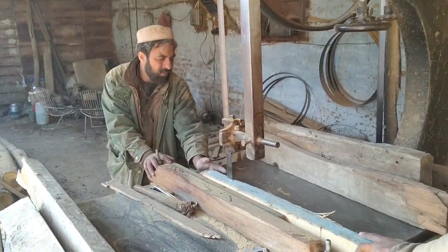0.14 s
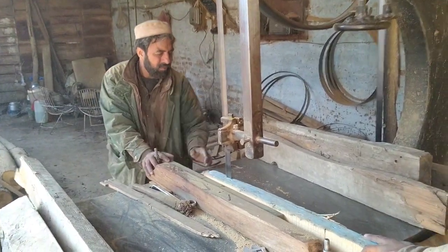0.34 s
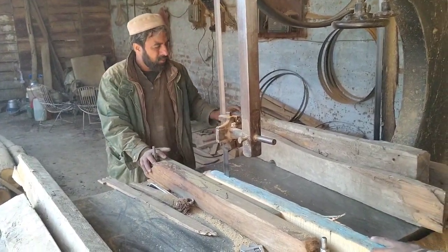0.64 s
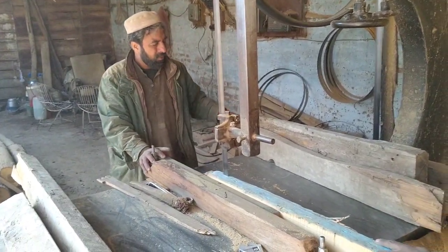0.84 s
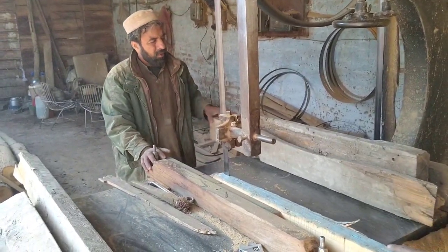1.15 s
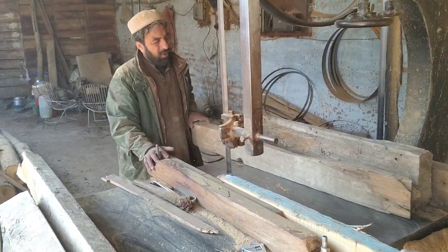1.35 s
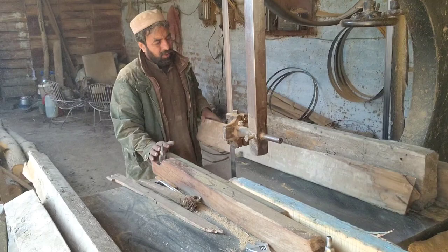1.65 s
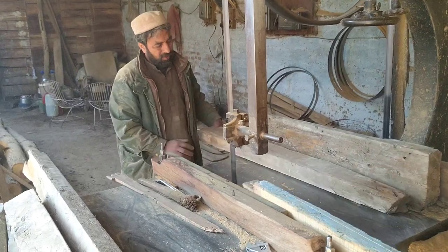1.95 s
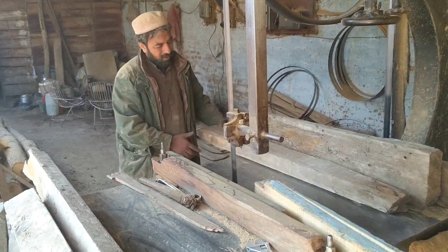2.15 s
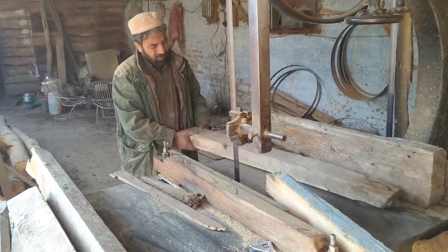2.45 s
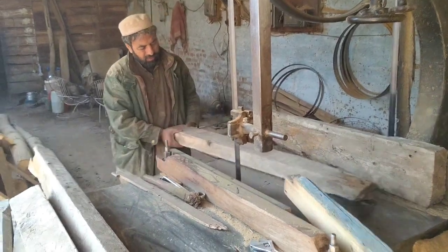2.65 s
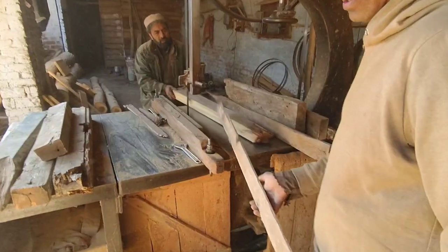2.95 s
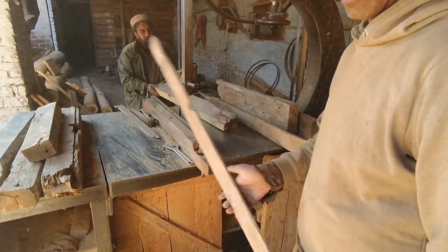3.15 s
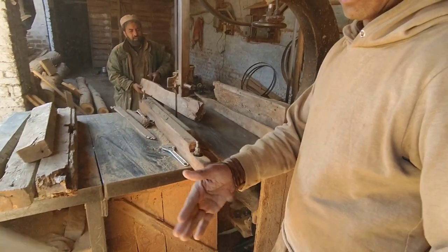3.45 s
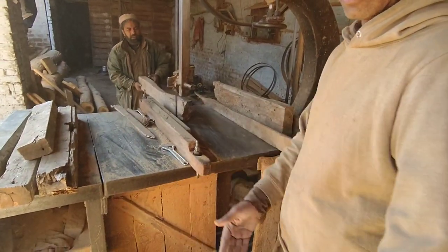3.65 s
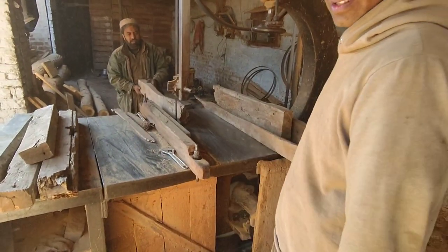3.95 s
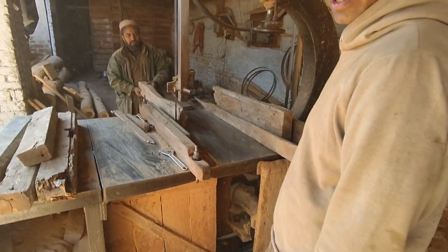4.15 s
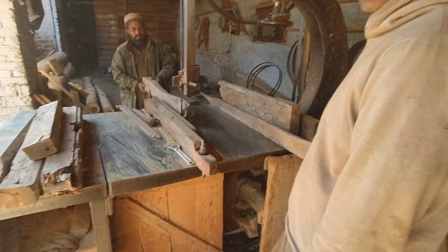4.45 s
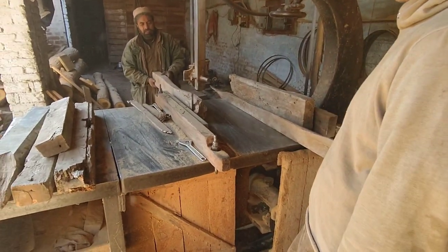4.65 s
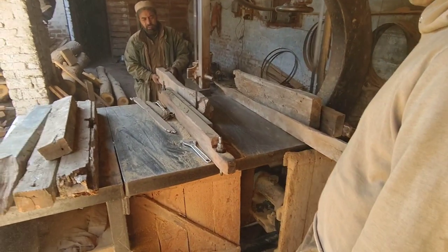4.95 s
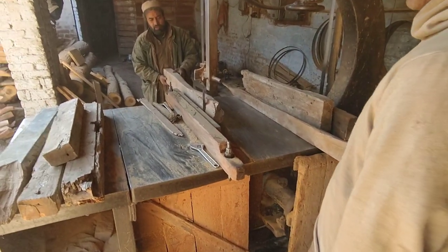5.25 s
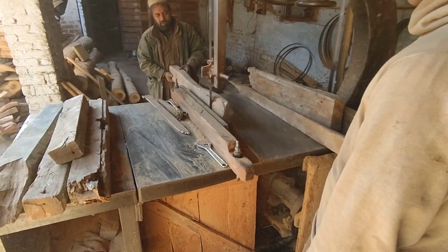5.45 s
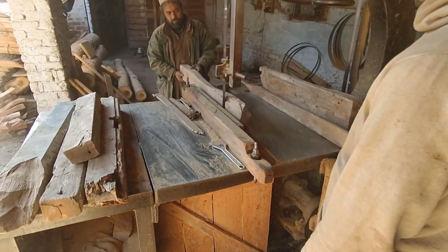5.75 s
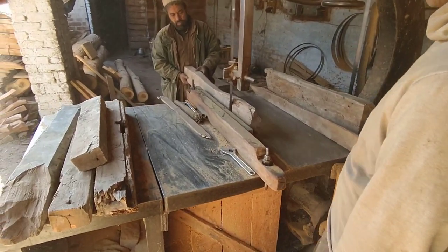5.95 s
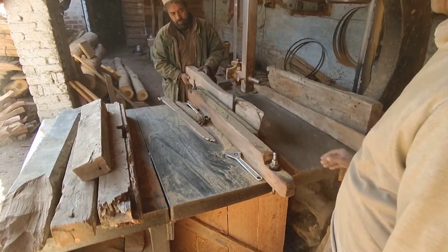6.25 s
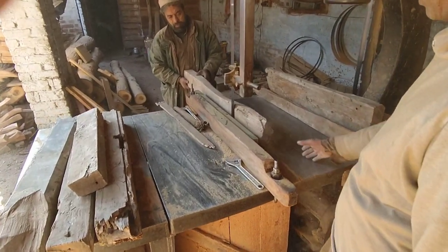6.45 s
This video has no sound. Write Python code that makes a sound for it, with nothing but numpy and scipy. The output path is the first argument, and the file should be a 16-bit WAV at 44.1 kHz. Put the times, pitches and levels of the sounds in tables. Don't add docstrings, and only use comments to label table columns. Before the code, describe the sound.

Handheld phone close to a running band saw in an open shed with a short echo. Steady tearing hiss wavers as wood is pushed into the blade, with ringing frame tones and a thin bearing squeal. A few wooden clacks come first, then an abrupt tiny silence and a changed, whinier saw tone. Sharp plank knocks follow, then a loud close clattering tumble that makes the saw dip before it recovers and continues.

```python
import sys
import numpy as np
from scipy import signal
from scipy.fft import rfft, irfft
from scipy.io import wavfile
from scipy.ndimage import uniform_filter1d

SR = 44100
rng = np.random.default_rng(int(sys.argv[2]) if len(sys.argv) > 2 else 0)


def log_audio(samples):
    frames = np.atleast_2d(samples).T
    limited = np.clip(frames, -1, 1)
    pcm = np.round(limited * 32767).astype(np.int16)
    wavfile.write(sys.argv[1], SR, pcm)


def voltage_ratio(level):
    return 10 ** (np.asarray(level, float) / 20)


N = 291060
T = np.arange(N) / SR

# pitch_hz, level_db (per Hz)
BODY_RIGHT = [(20, -8), (90, -9), (150, -2.5), (230, 1), (400, -3), (1100, 4), (1900, -1.5), (2300, -11.5)]
RASP = [
    [(1500, -19.5), (1900, -7.5), (2200, -2.5), (2750, 1.5), (3300, -1.5), (3700, -4), (4200, -29)],
    [(1500, -30.5), (1900, -4.5), (2300, -2.5), (2800, -2), (3300, -2.5), (3700, 1.5), (4200, -38)],
]
WHINE = [
    [(3650, -41), (3760, -7), (3900, -3.5), (4100, -4), (4500, -11.5), (5000, -12), (6200, -30.5),
     (6900, -37.5)],
    [(3650, -25), (3760, -8.5), (3900, -3.5), (4300, -2.5), (5000, -4.5), (5600, -8.5), (6200, -20),
     (7300, -24.5)],
]
FIZZ_RIGHT = [(5800, -18.5), (6500, -19), (7200, -10), (8200, -7.5), (10200, -5.5), (10600, 1), (12000, -5),
              (14300, -6)]
# pitch_hz, level_db (per Hz)
BODY_LEFT = [(20, -7.5), (80, -14), (140, -0.5), (230, 1.5), (400, -5), (1100, -3.5), (1500, -21),
             (2200, -35)]
BLADE_LEFT = [(1300, 12), (2200, 13.5), (3300, 6.5), (3750, 10), (4000, 15), (4600, 8.5), (5200, 2),
              (5650, -6.5)]
FIZZ_LEFT = [(5700, -20), (6250, -19), (6800, -9), (7600, -3), (9700, -2.5), (10650, 7), (12000, 4.5),
             (14300, 7)]
# pitch_hz, width_hz, first_scene_db,
# second_scene_db
METAL_RINGS = [(156, 30, 4, 5), (232, 22, 5, 6), (300, 30, 3, 3), (576, 30, 3, 5), (767, 22, 6, 4),
               (933, 26, 3, 4), (1100, 60, 4, 4), (1356, 16, 5, 6), (1750, 30, 1, 1.5),
               (2181, 24, 6, 3), (2719, 40, 4, 2), (3040, 40, 3, 1), (3266, 50, 3, 1), (4350, 36, 2, 3),
               (3900, 36, 2, 5), (3965, 28, 2, 5), (4030, 28, 2, 4), (4220, 40, 2, 2), (4500, 40, 1, 2),
               (4750, 50, 2, 3), (4890, 28, 1, 4)]
RINGS = METAL_RINGS
# pitch_hz, likeness (0 to 1)
LIKENESS = [(100, 1), (200, 0.95), (800, 0.99), (1300, 0.077), (2200, 0.082), (4000, 0.14), (6000, 0.21),
            (14000, 0.2)]
# start_s, end_s, pitch_hz, width_hz, rise_db
SPELLS = [(0, 1.76, 4362, 36, 7), (1.8, 2.15, 1356, 18, 4), (3.28, 3.55, 1356, 18, 4),
          (3.3, 3.5, 1110, 50, 5), (4.25, 4.7, 1356, 18, 3), (4.75, 5.12, 1750, 30, 4),
          (5.5, 5.92, 1750, 30, 4), (5.9, 6.6, 510, 50, 5), (2.42, 2.66, 400, 30, 7),
          (1.46, 1.82, 1000, 500, 3), (1.87, 2.66, 3980, 160, 4), (.62, .95, 12000, 5000, 2),
          (4.05, 4.4, 12000, 5000, -2), (2.42, 2.66, 2900, 1200, -2), (1.3, 1.745, 2900, 1000, 2),
          (1.76, 1.87, 3000, 600, 3), (.2, .66, 2800, 900, -2), (1.75, 1.97, 2200, 800, -4),
          (5.7, 6.6, 7400, 2400, -5), (2.8, 6.6, 890, 200, -3.5), (0, .8, 170, 200, -4),
          (6, 6.6, 150, 120, -4), (2.9, 4, 250, 300, 2.5), (.8, 1.46, 1300, 700, 2),
          (5.215, 5.26, 4800, 2000, -3.5), (5.08, 5.45, 11000, 6000, 2.5), (4.09, 4.135, 3100, 1000, 4),
          (5.26, 5.4, 600, 1200, -4), (5.12, 5.36, 6200, 1500, -3), (1.9, 2.66, 5000, 900, 1.5),
          (2.85, 3.7, 1105, 50, 3), (4.095, 4.13, 2500, 700, 4), (5.45, 6.0, 1790, 60, 4)]
# start_db, drift_db_per_s, jump_db
FIRST_LEVELS = [
    (-28, -3, 5),
    (-21.5, 1.22, -2),
    (-26.5, 0.43, 6),
    (-27, -1.18, 2),
    (-32.5, -2.5, 2),
    (-26.5, -3, -3),
]
# level_db, then shares (ratio) of surge, turning, nearness, duck
SECOND_LEVELS = [
    (-29, 0.86, -0.13, 0.88, 0.33),
    (-28, 1.02, -0.0056, 0.87, 0.25),
    (-17.5, 1.02, 0.052, 0.13, 0.49),
    (-24, 1.33, 0.054, 0.42, 0.31),
    (-32, 0.1, 0.23, 0.72, 1.05),
    (-29.5, 0.24, 0.67, .1, 0.91),
]
# time_s, left_turned_db, near_frame_db
HOLD = [
    (3.0, -12.5, -6),
    (3.35, -15, -3),
    (3.8, -14, 0),
    (4.2, -8, 0.5),
    (4.7, -7.5, 1.5),
    (4.95, 1, -1),
    (5.5, -5.5, -0.5),
    (5.9, -4, -1.5),
    (6.15, 3, -3),
    (6.6, 0.5, 0.5),
]
# time_s, surge_db, half_length_s
SURGES = [(0.0, -2.3, 0.029), (0.06, 3.5, 0.011), (0.167, -2, 0.062), (0.364, 2.5, 0.099),
          (0.52, -1, 0.053), (0.65, -3, 0.028), (0.718, 2.5, 0.027), (0.847, 1, 0.05), (1.116, -0.9, 0.056),
          (1.266, 0, .05), (1.527, 1, 0.074), (1.421, -4.5, 0.013), (1.667, 2, 0.033), (1.992, -2, 0.029),
          (2.163, 2, 0.022), (2.289, -4, 0.035), (2.39, 2, 0.032), (2.486, -2.4, 0.04), (2.998, 4, 0.1),
          (3.13, -3, 0.019), (2.22, 0.5, .04), (3.246, 1, 0.052), (3.33, -1.5, 0.051), (3.44, 2, 0.043),
          (3.577, -0.9, 0.054), (3.786, -1, .04), (4.303, 2, 0.054), (3.664, 2, 0.027), (3.883, 2.1, 0.09),
          (4.07, 1, 0.042), (4.183, -3.5, 0.047), (4.428, -2, 0.076), (4.6, -0.5, 0.035),
          (4.74, 0.5, 0.079), (4.873, -1, .05), (5.063, -1.5, 0.069), (5.157, -2, 0.035), (5.557, 0, .04),
          (5.76, 1, .04), (6.07, 1, 0.11), (6.508, 3, 0.026), (5.375, -3.5, 0.046), (5.674, 1.0, 0.15),
          (5.946, 3, 0.02), (6.24, -2, 0.048), (6.35, -1, 0.03), (6.543, -1.5, 0.051)]
# start_s, port (0 left, 1 right), depth_db, hold_s, recovery_s
DUCKS = [
    (1.742, 1, 7, 0.031, 0.037),
    (1.745, 0, -0.5, .14, .05),
    (2.726, 1, 21, 0.11, 0.08),
    (2.73, 0, 11.5, 0.099, 0.081),
    (4.132, 0, 1, 0.14, 0.045),
    (4.2, 1, 0.5, 0.25, 0.014),
    (5.16, 0, 6, 0.016, .02),
    (5.178, 0, 18, 0.064, 0.14),
]
# start_s, left_peak_db, low_mode_hz, high_mode_hz, decay_60db_s
KNOCKS = [(1.3366, -14, 270, 775, 0.091), (1.3394, -14.5, 768, 518, .09), (1.349, -12, 288, 760, .06),
          (1.358, -14.5, 350, 714, 0.05), (1.364, -20, 340, 250, 0.039), (1.376, -16.5, 325, 220, .12),
          (1.403, -19, 338, 240, 0.12), (1.43, -27, 284, 507, .1), (1.552, -24, 1100, 1163, 0.19),
          (1.9152, -17, 670, 880, 0.04), (1.919, -17, 232, 653, 0.076), (1.9278, -17.5, 235, 347, 0.08),
          (1.929, -16.5, 924, 486, 0.058), (1.938, -20, 297, 608, 0.15), (3.6421, -15.5, 292, 760, 0.077),
          (3.653, -15.5, 216, 420, 0.072), (3.668, -28, 225, 342, 0.066), (4.066, -9, 607, 946, 0.09),
          (4.078, -12, 580, 760, 0.057), (4.088, -15, 636, 755, 0.032), (4.098, -18, 1390, 1910, 0.036),
          (4.1023, -6, 563, 1420, 0.034), (4.107, -7.5, 1610, 1900, 0.025),
          (4.1115, -6.5, 1080, 1105, 0.09), (4.116, -11.5, 1076, 2000, 0.054),
          (4.121, -19, 936, 1390, 0.037), (4.131, -16, 760, 295, 0.16), (4.562, -16, 428, 590, 0.033),
          (4.573, -21, 704, 560, .05), (4.61, -18, 222, 515, 0.061), (1.34, -19.5, 165, 277, .08),
          (1.418, -24.5, 310, 414, .14), (3.68, -24, 202, 215, .12), (4.078, -15.5, 254, 750, 0.067)]
# start_s, peak_db, low_mode_hz, high_mode_hz, decay_60db_s
TUMBLE_LEFT = [(5.145, -15, 55.4, 100, 0.089), (5.2, -27, 36, 79, 0.66), (5.155, -11, 199, 420, 0.031),
               (5.16, -4.5, 304, 643, 0.025), (5.167, -5, 603, 1020, 0.018), (5.173, -7, 646, 300, .03),
               (5.182, -2.5, 360, 700, 0.017), (5.196, -15, 256, 497, 0.055), (5.207, -13, 282, 590, 0.071),
               (5.214, -17, 890, 400, 0.016), (5.2191, -5.5, 231, 830, 0.029),
               (5.229, -17, 790, 1060, 0.023), (5.241, -7, 264, 567, 0.024),
               (5.251, -13.5, 372, 700, 0.034), (5.276, -19, 392, 200, 0.04),
               (5.2896, -11.5, 260, 383, 0.034), (5.298, -11, 185, 300, .05),
               (5.329, -23.5, 145, 330, 0.15), (5.349, -25, 330, 180, .05)]
TUMBLE_RIGHT = [
    (5.148, -31, 300, 520, .03),
    (5.158, -13, 254, 555, 0.025),
    (5.165, -16, 330, 700, 0.022),
    (5.192, -23, 230, 400, .07),
    (5.219, -26, 330, 494, 0.038),
    (5.234, -19, 380, 250, 0.02),
    (5.262, -35, 330, 705, .03),
    (5.273, -19, 230, 507, 0.023),
    (5.285, -23, 250, 330, .08),
]
# start_s, end_s, pitch_hz, level_db
SINGS = [(0, 1.8, 1356, -47), (1.8, 2.15, 1356, -44), (2.15, 2.66, 1356, -48), (2.85, 3.2, 1357, -46),
         (3.15, 3.75, 1357, -41), (3.8, 5.17, 1356, -46), (5.27, 5.6, 1356, -46), (5.6, 6.6, 1356, -49),
         (2.9, 3.6, 1324, -48), (3.25, 3.5, 1118, -42), (3.3, 3.55, 1076, -46), (4.2, 4.75, 1065, -46),
         (3.35, 3.55, 1725, -44), (4.4, 5.15, 1748, -44), (5.45, 5.98, 1735, -42), (6.0, 6.5, 1733, -46),
         (.25, 1.76, 4364, -40), (.4, .8, 2194, -41), (1.2, 1.75, 2180, -41), (2.4, 2.66, 398, -44),
         (5.4, 5.75, 581, -46), (6.0, 6.6, 581, -46), (6.0, 6.6, 525, -46), (5.6, 6.6, 161, -47),
         (5.3, 5.75, 2088, -44), (5.9, 6.5, 236, -47), (4.5, 5.12, 157, -46), (3.7, 4.6, 232, -46),
         (5.3, 6.4, 1090, -48)]
# pitch_hz, step_db
ROUNDING_STEP = [(900, -14), (1200, -8), (1700, 1), (2500, 7.5), (4300, 5.5), (7000, 5), (10500, 5),
                 (14000, 5)]

CHANGE_S = 2.73
STOP_S, RETURN_S = 2.6655, (2.8005, 2.8115)
SCRAP_S = (2.7685, 2.7725)
BASS_BACK_S = 3.04
CLEARS_S, CLEARING_S = 1.78, 0.091
DIP_S, DIP_DB = (5.178, 5.261), -7.5
WHEEL_HZ, WHEEL_DB = 16.1, -13
RIGHT_KNOCK_DB, RIGHT_DB_PER_OCTAVE = -8, 1
PATCHES = 34
STEP_LEFT_DB, STEP_OVER_BAND_DB, STEP_SPREAD_DB = -2.5, 13, 2.5
EDGE_HZ = 14400


def evened(x):
    return x / np.sqrt(np.mean(x ** 2) + 1e-20)


def read(points, hz):
    f, value = np.transpose(points)
    return np.interp(np.log(hz + 1), np.log(f + 1), value)


def power(points, hz):
    inside = (hz <= points[-1][0]) * (hz >= points[0][0])
    p = voltage_ratio(2 * read(points, hz)) * inside
    return (p / p.sum())[:, None]


def flicker(hz):
    z = rfft(rng.standard_normal(N))
    slow = 1 / np.sqrt(1 + (np.fft.rfftfreq(N, 1 / SR) / hz) ** 4)
    return evened(irfft(z * slow, N))


def peaks(hz, centre_hz, width_hz):
    return 1 / (1 + (2 * (hz[:, None] - centre_hz) / width_hz) ** 2)


def add(mix, s, sound):
    part = mix[round(s * SR):][:len(sound)]
    part += sound[:len(part)]


def levels(t):
    start, drift, jump = np.transpose(FIRST_LEVELS)[:, :, None]
    first = start + drift * np.minimum(t, CLEARS_S)
    first = first + jump / (1 + np.exp(-(t - CLEARS_S) / CLEARING_S))
    second, surge, turn, near, duck = np.transpose(SECOND_LEVELS)[:, :, None]
    at, turned_db, near_db = np.transpose(HOLD)
    second = second + turn * np.interp(t, at, turned_db) + near * np.interp(t, at, near_db)
    surges_db = sum(db * np.exp(-((t - s) / half) ** 2) for s, db, half in SURGES)
    ducks_db = np.zeros((2, len(t)))
    for s, port, db, hold, back in DUCKS:
        ducks_db[round(port)] += db * (t > s) * np.exp(-(t - s - hold).clip(0) / back)
    layer_ports = [1, 1, 1, 1, 0, 0]
    return np.where(t > CHANGE_S, second, first) + surge * surges_db - duck * ducks_db[layer_ports]


def shop(x):
    t = np.arange(12000) / SR
    tail = rng.standard_normal((2, 12000)) * voltage_ratio(-60 * t / 0.08) * (t > .006)
    return signal.fftconvolve(x, tail / np.linalg.norm(tail[0]), axes=1)[:, :N]


def knock(low_hz, high_hz, t60, chance):
    t = np.arange(9000) / SR
    weak_hz = low_hz * np.geomspace(.6, 4.6, 14) * (1 + .1 * chance[:14])
    weak_db = -11.5 - 4.5 * abs(np.log2(weak_hz / low_hz)) + 2.5 * chance[14:28]
    hz = np.r_[low_hz, high_hz, weak_hz][:, None]
    db = np.r_[0, -1.5, weak_db][:, None]
    ring_s = t60 * np.minimum(1, (high_hz / hz) ** 0.64) * np.where(db < -2, .65, 1)
    modes = voltage_ratio(db - 60 * t / ring_s) * np.sin(2 * np.pi * hz * t) * (1 - np.exp(-t / 0.0005))
    gaps = 70 + np.minimum(40 * abs(chance[28:]), 45)
    rattle = np.zeros(1300)
    taps = .55 * chance[28:] * voltage_ratio(-2.2 * np.arange(11))
    rattle[np.cumsum(np.r_[0, gaps]).astype(int)] = np.r_[1, taps]
    x = modes[:2].sum(0) + signal.oaconvolve(modes[2:].sum(0), rattle)[:len(t)]
    x = signal.sosfilt(signal.butter(2, 0.5 * low_hz, "high", fs=SR, output="sos"), x)
    return -x / abs(x).max()


def planks():
    out = np.zeros((2, N))
    thin = signal.butter(1, 450, "high", fs=SR)
    spots = rng.standard_normal((PATCHES, 39))
    for (s, db, *body), chance in zip(KNOCKS, spots):
        sound = voltage_ratio(db) * knock(*body, chance)
        add(out[0], s + 8 / SR, sound)
        right_db = RIGHT_KNOCK_DB + 8.0 + RIGHT_DB_PER_OCTAVE * np.log2(body[0] / 260)
        add(out[1], s, voltage_ratio(right_db) * signal.lfilter(*thin, sound))
    for port, hits in zip(out, (TUMBLE_LEFT, TUMBLE_RIGHT)):
        for (s, db, *body), chance in zip(hits, spots[::-1]):
            add(port, s, voltage_ratio(db) * knock(*body, chance))
    return out


def bearing():
    wander, out = flicker(hz=7.9), np.zeros(N)
    for t0, t1, hz, db in SINGS:
        span = slice(round(t0 * SR), round(t1 * SR))
        swell = np.hanning(span.stop - span.start) ** .3 * voltage_ratio(4 * wander[::-1][span] - 2)
        phase = 2 * np.pi * np.cumsum(hz * (1 + .0025 * wander[span])) / SR
        out[span] += voltage_ratio(db + 4.5) * swell * np.sin(phase)
    shade = signal.butter(2, 2000, fs=SR)
    return np.array([voltage_ratio(-3.0) * signal.lfilter(*shade, out), out])


def wheel():
    on = np.where((T > STOP_S) & (T < BASS_BACK_S), voltage_ratio(-26.5), 1)
    coarse = T[::512]
    level_db = np.interp(T, coarse, levels(coarse)[4]) + WHEEL_DB
    return np.array([[1], [.2]]) * on * voltage_ratio(level_db) * np.sin(2 * np.pi * WHEEL_HZ * T)


def saw_colours(t, hz):
    late = t > CHANGE_S
    *right, low, high = voltage_ratio(2 * levels(t))
    rasp, whine = (np.where(late, power(s[1], hz), power(s[0], hz)) for s in (RASP, WHINE))
    body_left = power(BODY_LEFT, hz) * low * voltage_ratio(5.0)
    body_right = power(BODY_RIGHT, hz) * right[0] * voltage_ratio(-6.5)
    body_right = body_right * np.where(late, 1, voltage_ratio(-6 / (1 + (hz[:, None] / 600) ** 2)))
    blade_left = power(BLADE_LEFT, hz) * low ** 0.58 * high ** .4 * voltage_ratio(np.where(late, -9, -6))
    blade_left = blade_left + power(FIZZ_LEFT, hz) * high
    blade_right = rasp * right[1] + whine * right[2] + power(FIZZ_RIGHT, hz) * right[3]
    bass_cut = np.where((hz[:, None] < 110) & late & (t < BASS_BACK_S), voltage_ratio(-13), 1)
    return np.array([body_left, body_right]) * bass_cut ** 2, np.array([blade_left, blade_right])


def saw_rings(t, hz):
    waver = evened(uniform_filter1d(rng.standard_normal((len(t), len(RINGS))), 14, 0))
    f, width, one, two = np.transpose(RINGS)
    rise_db = np.where(t[:, None] > CHANGE_S, two, one) * (1 + 0.5 * waver)
    rings_db = peaks(hz, f, width) @ rise_db.T
    t0, t1, f, width, db = np.transpose(SPELLS)
    active = (t[:, None] > t0) * (t[:, None] < t1)
    rings_db = rings_db + peaks(hz, f, width) @ (db * active).T
    return rings_db * np.array([.65, 1])[:, None, None]


def saw():
    frames, hz = N // 512 + 5, np.fft.rfftfreq(2048, 1 / SR)
    t = np.arange(frames) * 512 / SR
    a, b, c, d, patches = rng.standard_normal((frames, 1025, 5)).T
    patches = evened(uniform_filter1d(uniform_filter1d(patches, 16, 0), 8, 1))
    same = np.clip(read(LIKENESS, hz)[:, None] * np.where(t > CHANGE_S, .8, 1), -1, 1)
    lag = np.exp(-1j * (0.51 + 2 * np.pi * hz * 9.2 / SR))[:, None]
    right = a + 1j * b
    left = lag * (same * right + np.sqrt(1 - same ** 2) * (c + 1j * d))
    z = np.array([left, right]) * voltage_ratio(saw_rings(t, hz) + 0.9 * patches)
    body, blade = (signal.istft(z * np.sqrt(p), nperseg=2048, noverlap=1536)[1][:, :N]
                   for p in saw_colours(t, hz))
    bite = voltage_ratio(0.5 * flicker(hz=161) + 1.06 * flicker(hz=6.7))
    dipped = 1. * ((T > DIP_S[0]) & (T < DIP_S[1]))
    dip = voltage_ratio(DIP_DB * uniform_filter1d(dipped, size=200))
    return (1.114 * body + 1.151 * blade * bite) * np.array([np.sqrt(dip), dip])


def scene():
    wood = planks()
    return saw() + wheel() + wood + voltage_ratio(-10.0) * shop(wood) + bearing()


def round_spectrum(x):
    n, k = np.arange(2048)[:, None], np.arange(1024)
    lead, frames = 2048 - 179, N // 1024 + 3
    basis = np.sin(np.pi * (n + .5) / 2048) * np.cos(np.pi / 1024 * (n + 512.5) * (k + .5))
    padded = np.pad(x, ((0, 0), (lead, 4096)))
    starts = 1024 * np.arange(frames)
    slices = padded[:, starts[:, None] + n.T].reshape(-1, 2048)
    c = (slices @ basis).reshape(2, frames, -1)
    band_db = 10 * np.log10((c ** 2).reshape(2, frames, 64, 16).mean(3) + 1e-12)
    band_hz = (np.arange(64) + .5) * SR / 128
    step_db = read(ROUNDING_STEP, band_hz) + np.reshape([STEP_LEFT_DB, 0], (2, 1, 1))
    step_db = np.minimum(step_db, band_db + STEP_OVER_BAND_DB)
    step_db = step_db + STEP_SPREAD_DB * rng.standard_normal(band_db.shape)
    step = np.repeat(voltage_ratio(step_db), 16, axis=2)
    rounded = np.sign(c) * step * np.floor((abs(c) / step) ** .75 + .4054) ** (4 / 3)
    at_change = abs((starts - lead + 1024) / SR - 2.74) < .11
    kept = np.where(at_change[:, None] | (k < 40), c, rounded).reshape(-1, 1024)
    parts = (kept @ basis.T / 512).reshape(2, frames, -1)
    out = parts[:, 1:, :1024] + parts[:, :-1, 1024:]
    return out.reshape(2, -1)[:, lead - 1024:][:, :N]


def low_pass(x):
    return signal.sosfilt(signal.butter(12, 15600, fs=SR, output="sos"), x)


def record(dry):
    remainder = voltage_ratio(-33 - 1300 * (T - STOP_S).clip(0)) * (T < 2.694)
    gate = np.where(T < STOP_S, 1, remainder)
    gate = gate + voltage_ratio(-7.0) * ((T > SCRAP_S[0]) & (T < SCRAP_S[1]))
    gate = uniform_filter1d(gate + (T > np.array(RETURN_S)[:, None]), size=24, axis=1)
    x = .8 * np.tanh(dry / .8) * gate
    treble_edge = signal.firwin(511, EDGE_HZ, window=("kaiser", 9), fs=SR)
    x = signal.oaconvolve(x, treble_edge[None], "same")
    x = round_spectrum(x)
    return low_pass(x)


dry = scene()
out = record(dry)
log_audio(out)
```